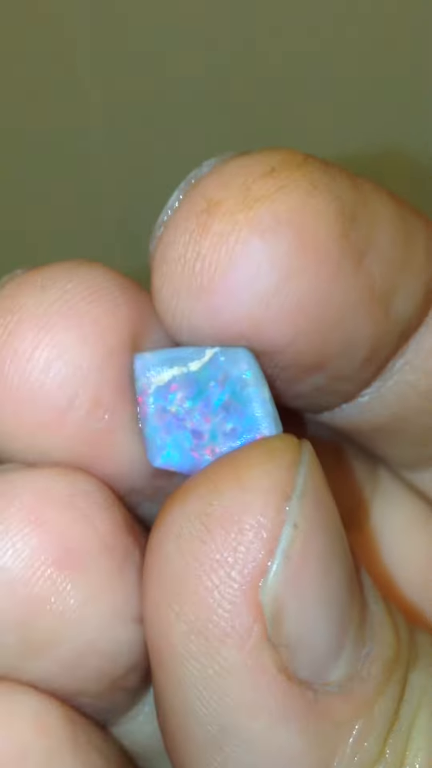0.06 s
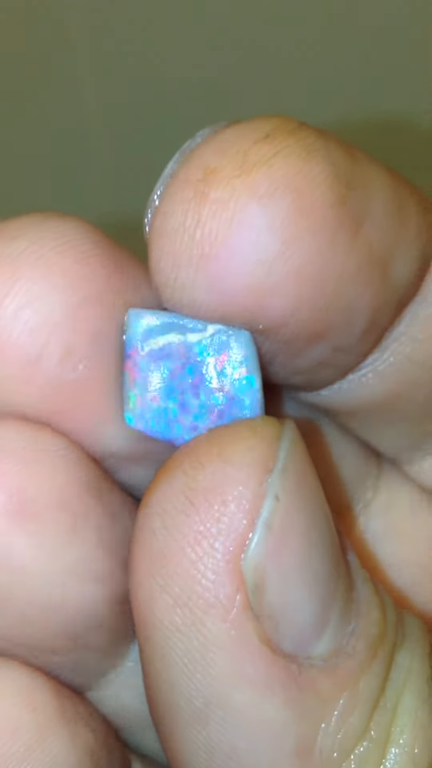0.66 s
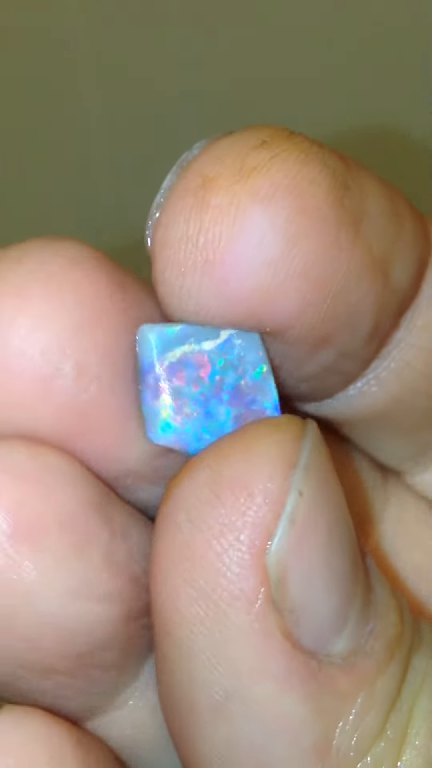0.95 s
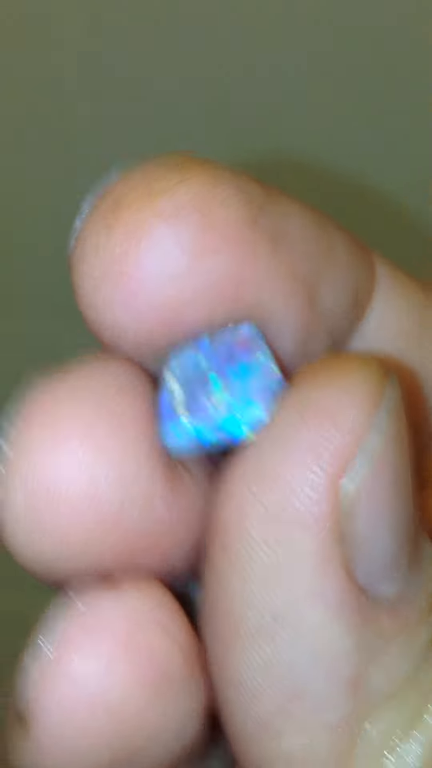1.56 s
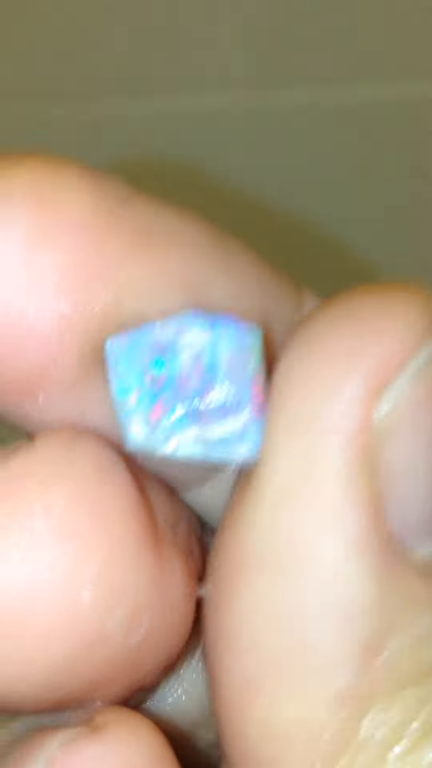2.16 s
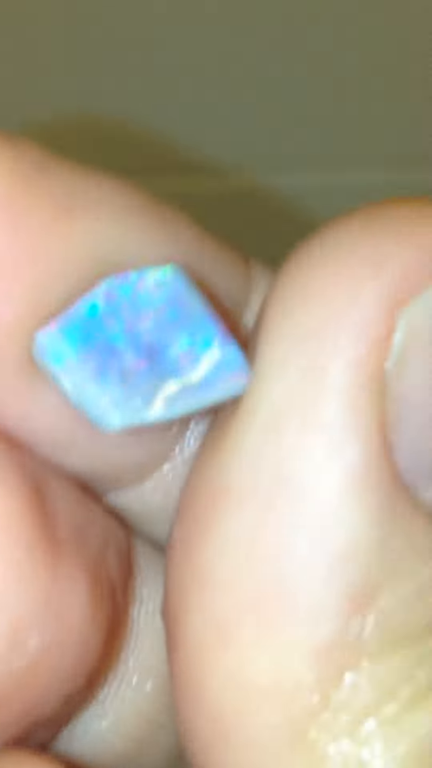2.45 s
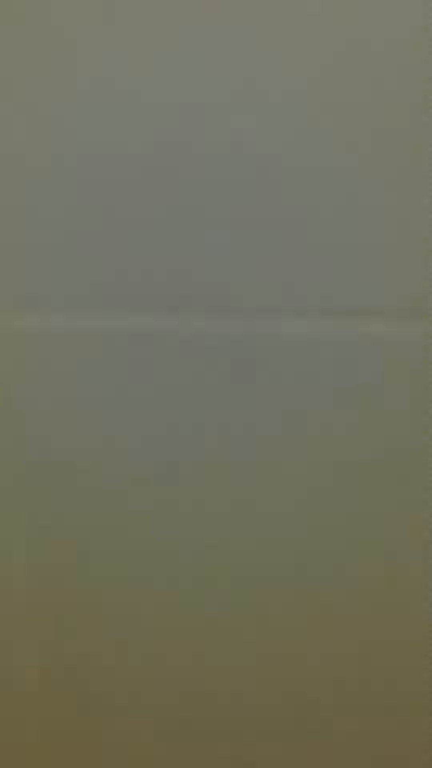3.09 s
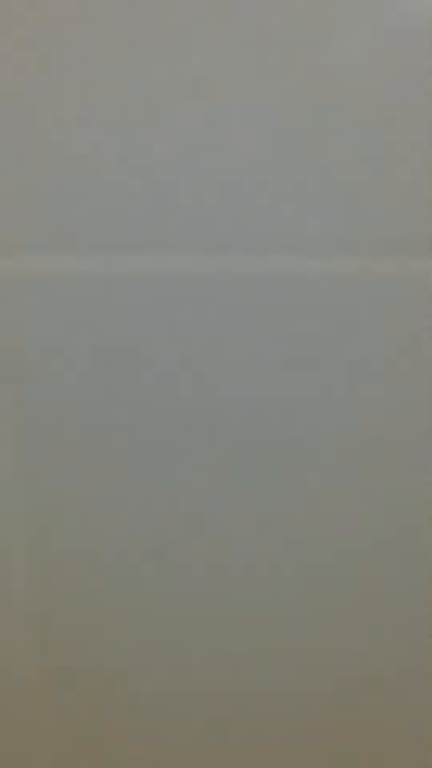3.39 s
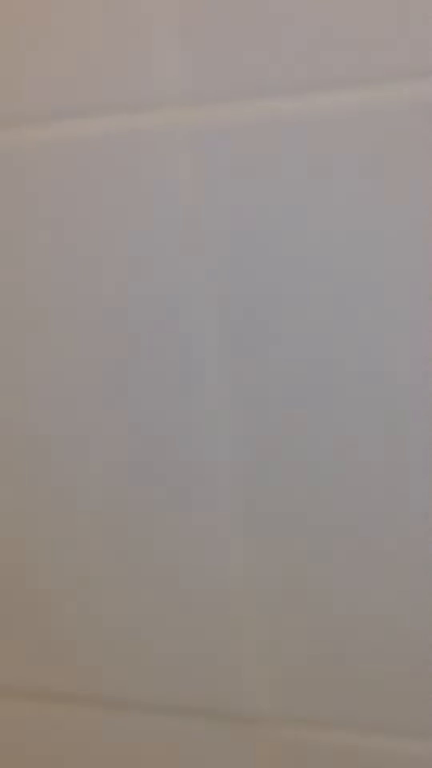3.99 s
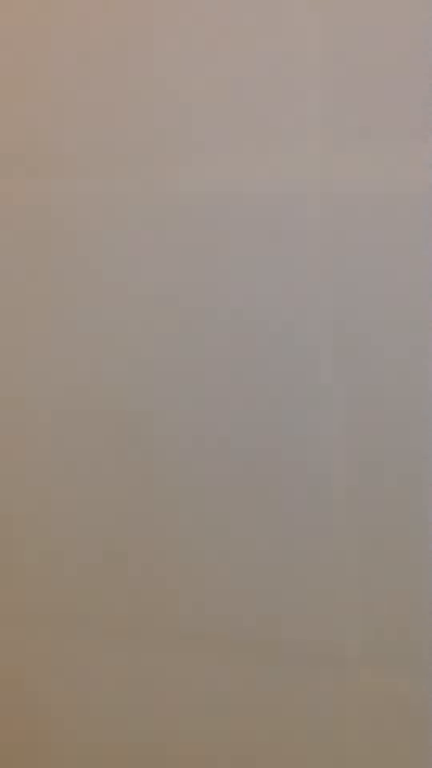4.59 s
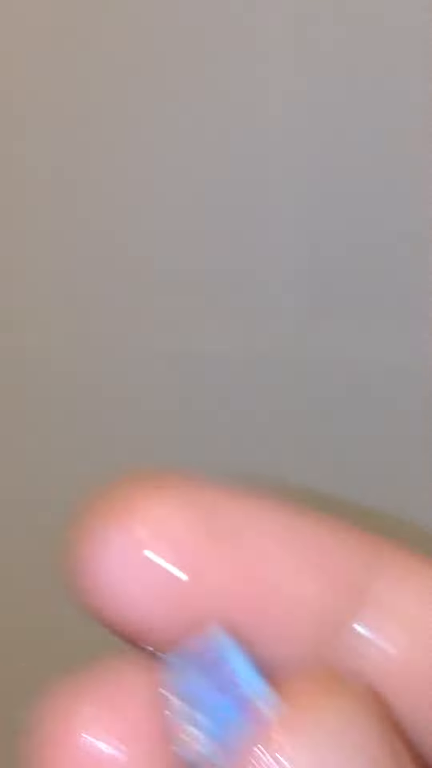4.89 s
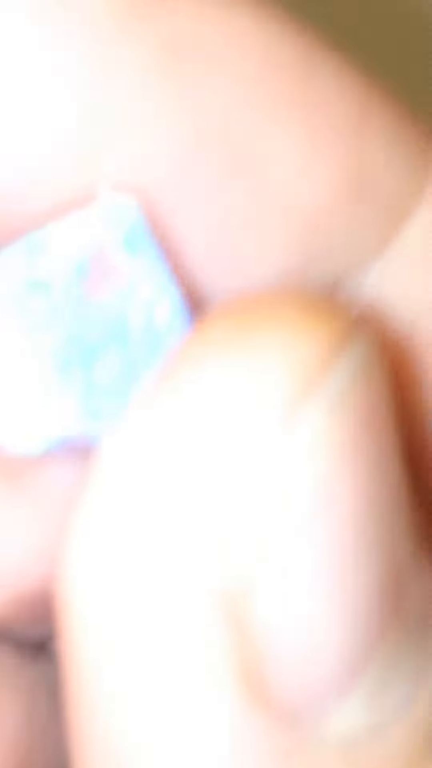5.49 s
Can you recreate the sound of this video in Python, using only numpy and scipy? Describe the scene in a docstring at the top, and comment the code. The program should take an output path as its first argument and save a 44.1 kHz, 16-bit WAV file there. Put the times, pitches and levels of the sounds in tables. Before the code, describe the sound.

Water drips sharply and irregularly in a small tiled room over a faint fizzing trickle, with a few soft knocks on the microphone.

```python
"""Water drips close to a camera in a small tiled room. Each drop is a bright splat plus the brief,
rising ring of a trapped bubble, thrown back by the hard walls. The highest sounds are small dry ticks
close to the microphone, perhaps a fingertip on the camera. Underneath fizzes a thin stream of
mist and tiny droplets that swells round the main drops and breaks off once.
A hand knocks softly on the camera a few times, over room air, a rumble and a low hum."""
import sys
import numpy as np
from scipy import signal
from scipy.fft import rfft, irfft, next_fast_len
from scipy.io import wavfile

SR = 44100
rng = np.random.default_rng(int(sys.argv[2]) if len(sys.argv) > 2 else 0)


def put_to_file(sound):
    """Save the sound as 16-bit audio at rate SR, in the file named by the first command-line argument."""
    columns = np.atleast_2d(sound).T  # one column per channel
    safe = np.clip(columns, -1, 1)
    whole_steps = np.round(safe * 32767)
    wavfile.write(sys.argv[1], SR, whole_steps.astype(np.int16))


N = 244314


def amp(db):
    """Decibels to gain."""
    return 10 ** (np.asarray(db) / 20)


def unit_rms(x):
    """Scales to an rms of one."""
    return x / np.sqrt(np.mean(x ** 2) + 1e-20)


def unit_burst(x, window_s=0.01):
    """Scales a one-shot to the energy of an rms of one held for window_s."""
    return x * np.sqrt(window_s * SR / (np.sum(x ** 2) + 1e-20))


def curve_at(points, hz):
    """Reads a curve on a log-frequency axis."""
    freqs, values = np.transpose(points)
    return np.interp(np.log(hz + 1), np.log(freqs + 1), values)


def add(mix, start_s, sound):
    """Lays a sound into the mix at start_s."""
    part = mix[max(round(start_s * SR), 0):][:len(sound)]
    part += sound[:len(part)]


def equalise(x, eq, size=2048):
    """Causal filter that follows an EQ curve."""
    log_gain = np.log(amp(curve_at(eq, abs(np.fft.fftfreq(size, 1 / SR)))))
    taps = np.fft.ifft(np.exp(signal.hilbert(log_gain).conj())).real
    return signal.fftconvolve(x, taps)[:len(x)]


def noise(gain_at):
    """Steady noise with the spectrum gain_at(Hz) and an rms of one."""
    size = next_fast_len(N, True)
    spectrum = rfft(rng.standard_normal(size)) * gain_at(np.fft.rfftfreq(size, 1 / SR))
    return unit_rms(irfft(spectrum, size)[:N])


def drift(rate_hz):
    """Smooth random modulator with an rms of one, rolling off above rate_hz."""
    steps = N // 64 + 1
    freqs = np.fft.rfftfreq(steps, N / steps / SR)
    slow = irfft(rfft(rng.standard_normal(steps)) / (1 + (freqs / rate_hz) ** 4), steps)
    return unit_rms(np.interp(np.linspace(0, steps - 1, N), np.arange(steps), slow))


# tone of the room's air: (frequency [Hz], relative level [dB])
AIR_EQ = [(20, -17), (40, -55), (65, -11), (90, -9.5), (150, 1), (220, -8.5), (400, -8.5), (800, -17.5),
          (1700, -17), (3000, -16.5), (4300, -15), (7500, -17.5), (15000, -26.5)]
# midrange bands that come and go: (centre [Hz])
WAVERING_BANDS = [310, 380, 1150]
# fader ride of the rumble, before its random swell: (time [s], level [dB])
RUMBLE_RIDE = [(0, -67), (1.25, -65.5), (1.5, -73.5), (2.0, -67.5), (2.3, -71), (3.3, -72), (3.95, -63),
               (4.15, -71), (4.95, -79), (5.2, -60.5), (5.54, -69)]
# partials of the hum: (frequency [Hz], average level [dB])
HUM_PARTIALS = [(71, -74), (119.5, -73.5), (240, -78), (482, -79.5)]

def room_tone(air_db=-61.5, mids_db=-79.0, rumble_hz=72, rumble_width_hz=11):
    """The bed: soft air with restless mids, a swelling rumble and a wavering hum."""
    t = np.arange(N) / SR
    rumble = noise(lambda f: 1 / (1 + ((f - rumble_hz) / rumble_width_hz) ** 2))
    bed = amp(air_db) * noise(lambda f: amp(curve_at(AIR_EQ, f)))
    for centre in WAVERING_BANDS:
        band = noise(lambda f: 1 / (1 + ((f - centre) / (0.54 * centre)) ** 4))
        bed += band * amp(mids_db + 3 * drift(rate_hz=21))
    bed += rumble * amp(np.interp(t, *np.transpose(RUMBLE_RIDE)) + 4 * drift(rate_hz=12))
    for hz, db in HUM_PARTIALS:
        peak = np.sqrt(2) * amp(db + 2 * drift(rate_hz=2.3))
        bed += peak * np.sin(2 * np.pi * hz * t + 0.78 * drift(rate_hz=0.73))
    return bed


# slap off a close corner, about as loud as the direct sound: (delay [s], gain [linear])
CORNER_SLAP = [(.0031, .4), (.0038, 1.05), (.0046, -.35)]
# early reflections off the farther walls: (delay [s], gain [linear])
WALL_ECHOES = [(.0062, 0.23), (.0095, 0.22), (0.016, 0.17), (.0200, 0.24), (.0260, 0.39)]
# reverb of the tiles: (frequency [Hz], time to fall 60 dB [s])
TILE_DECAY = [(300, 0.4), (2000, 0.2), (4500, 0.22), (8000, 0.21), (15000, 0.15)]

def tiled_room(tail_db, build_s=0.0032, size=16384, spacing=16):
    """Impulse response from one random spot: direct sound, corner slap, walls, then a dense tail."""
    echoes = np.zeros(size)
    at = np.arange(0, size, spacing) + rng.integers(0, spacing, size // spacing)
    echoes[at] = rng.choice([-1, 1], len(at)) * amp(4.15 * np.clip(rng.standard_normal(len(at)), -2, 2))
    hz, t, bands = signal.stft(echoes, SR, nperseg=256)
    decay = amp(-60 * t / curve_at(TILE_DECAY, hz)[:, None])
    tail = signal.istft(bands * decay, SR)[1][:size]
    tail *= np.minimum(np.arange(size) / SR / build_s, 1)
    response = amp(tail_db) * tail / np.linalg.norm(tail)
    response[0] += 1
    for delay, gain in CORNER_SLAP + WALL_ECHOES:
        response[round(delay * SR * rng.uniform(0.95, 1.05))] += gain
    return response


def ring(hz, glide, decay_cycles, size=2048):
    """A damped resonance; in a drop, an air bubble whose pitch rises as it nears the surface."""
    age = np.arange(size) / SR * hz / decay_cycles  # in decay times
    pitch = hz * 2 ** (glide * (np.minimum(age, 1.8) - 0.8))
    attack = (1 - np.exp(-age / 0.25)) ** 2
    return unit_burst(attack * np.exp(-age) * np.sin(2 * np.pi * np.cumsum(pitch) / SR))


# cues for the hand on the camera: (time [s], dry level [dB], pitch [Hz])
KNOCK_CUES = [(3.037, -55.5, 105), (3.1026, -56, 980), (3.794, -59, 610), (4.019, -55.5, 69.4),
              (4.8942, -51.5, 1033)]

def hand_knocks(send_db=-2.0):
    """Dull knocks that reach the microphone mostly through the camera body, with some room."""
    thuds = np.zeros(N)
    for start_s, db, hz in KNOCK_CUES:
        add(thuds, start_s, amp(db) * ring(hz, glide=0, decay_cycles=0.65))
    room = tiled_room(tail_db=1.5)
    return thuds + amp(send_db) * signal.fftconvolve(thuds, room / np.linalg.norm(room))[:N]


# tone of water hitting the wet surface: (frequency [Hz], relative level [dB])
SPLAT_EQ = [(300, -16), (1200, -0.5), (2200, 0), (4200, -5), (6200, -1), (7900, -1), (10000, -4),
            (12500, 0.5), (15500, -3.5)]

def splat(ring_hz, decay_s, attack_s=0.000096, size=1024):
    """The impact, a crack of noise: a larger drop has a lower bubble and a duller crack."""
    t = np.arange(size) / SR
    envelope = (1 - np.exp(-t / attack_s)) * np.exp(-t / decay_s)
    crack = equalise(rng.standard_normal(size) * envelope, SPLAT_EQ)
    edges_hz = [min(0.82 * ring_hz, 4000), min(2.98 * ring_hz, 0.45 * SR)]
    return unit_burst(signal.lfilter(*signal.butter(2, edges_hz, "bandpass", fs=SR), crack))


def stream_gate(t, break_s=4.15, resume_s=4.456, fade_db_per_s=420):
    """The stream breaks off once: a fast fade out, then a hard cut back in."""
    return np.where(t < resume_s, amp(-fade_db_per_s * np.maximum(t - break_s, 0)), 1)


# fader ride of the stream: (time [s], relative level [dB])
FLOW_RIDE = [(0.0, -61), (0.15, -52), (0.28, -56), (0.51, -59), (0.72, -59.5), (1.05, -53), (1.48, -58),
             (2.02, -56.5), (2.61, -60.5), (2.97, -52.5), (3.23, -59.5), (3.93, -51.5), (4.01, -65.5),
             (4.1, -58.5), (4.7, -56.5), (4.898, -54), (5.392, -55.5), (5.54, -54)]

def stream_flow(trim_db=1.5, waver_db=0.66, surge_db=-9.5, rise_s=0.0083, fall_s=0.084):
    """The stream's envelope: it surges round each foreground cue, more for a louder crack."""
    t = np.arange(N) / SR
    ride_db = np.interp(t, *np.transpose(FLOW_RIDE))
    power = amp(trim_db + ride_db + waver_db * drift(rate_hz=12)) ** 2
    for start_s, _, _, _, crack_db in DRIP_AND_TICK_CUES:
        away = np.maximum((start_s - t) / rise_s, (t - start_s) / fall_s)
        power += (amp(crack_db + surge_db) * np.exp(-np.minimum(away, 20))) ** 2
    return stream_gate(t) * np.sqrt(power)


# tone of the fine spray: (frequency [Hz], relative level [dB])
MIST_EQ = [(400, -15), (1000, -10.5), (1600, -13.5), (3000, -14.5), (5000, -17), (7500, -20), (10000, -9.5),
           (12500, -9.5), (15500, -9.5)]

def stream(mist_db=-2.5, patter_db=-2.0, droplets_per_s=400, spread_db=6.5, spots=16):
    """The thin stream breaks into a fine mist and a patter of tiny droplets; both follow the flow."""
    flow = stream_flow()
    hiss = noise(lambda f: amp(curve_at(MIST_EQ, f)))
    mist = unit_rms(hiss * amp(2 * drift(rate_hz=114)))
    triggers = rng.random(N) < droplets_per_s / SR
    hits = triggers * amp(spread_db * np.minimum(rng.exponential(1, N), 3))
    landing_spot = rng.integers(0, spots, N)
    patter = np.zeros(N)
    for spot, hz in enumerate(np.geomspace(7000, 14500, spots)):
        droplet = ring(hz, glide=0.17, decay_cycles=1.9)
        add(droplet, 0, splat(hz, decay_s=0.00066))
        droplet_in_room = signal.fftconvolve(droplet, tiled_room(tail_db=5.5))
        patter += signal.oaconvolve(hits * (landing_spot == spot), droplet_in_room)[:N]
    return flow * (amp(mist_db) * mist + amp(patter_db) * unit_rms(patter))


def filler_cues(per_s=11, low_hz=6900, high_hz=13500, glide=0.26, spread_db=2):
    """Faint, high drips and ticks, loosely spaced while the stream runs."""
    cues = []
    for slot, (when, strength, pitch, force) in enumerate(rng.random((128, 4))):
        start_s = (slot + when) / per_s
        if start_s < N / SR and stream_gate(start_s) > 0.5:
            ring_db = -51.5 + spread_db * (2 * strength - 1)
            crack_db = ring_db - 5.5 + spread_db * (2 * force - 1)
            hz = low_hz * (high_hz / low_hz) ** pitch
            cues.append((start_s, ring_db, hz, glide, crack_db))
    return cues


# tone that the wet surface gives the drips: (frequency [Hz], gain [dB])
SURFACE_EQ = [(120, -28), (400, 1), (800, -7), (1250, -10), (1700, -0.5), (2600, -1.5), (15000, -1.5)]
# foreground drips and, near 12 kHz, dry ticks: (time [s], relative ring level [dB], pitch [Hz],
# upward glide [octaves per decay time], relative crack level [dB])
DRIP_AND_TICK_CUES = [ (.116, -43, 6670, .2, -48), (0.1294, -36.5, 4860, 0.32, -44.5),
                      (.267, -49, 10700, 0.31, -52), (.587, -46, 11600, .5, -53),
                      (.698, -37.5, 9300, 0.88, -42.5), (0.8525, -37, 4900, 0.55, -48),
                      (1.1566, -39, 4030, 0.64, -41), (1.3175, -47.5, 8200, 0.17, -68),
                      (1.447, -52, 2140, 0.77, -56), (1.4897, -50, 11800, 0.28, -53),
                      (1.803, -40.5, 11400, 0.74, -49.5), (1.8843, -54, 8600, 0.41, -47),
                      (2.0079, -28, 4230, 0.32, -34.5), (2.309, -40, 5600, .42, -50),
                      (2.5284, -61, 13200, 0.89, -44), (2.5964, -36.5, 5800, .3, -39.5),
                      (2.9105, -45, 7300, 0.54, -50), (2.9635, -40.5, 3840, 0.39, -53),
                      (2.963, -38.5, 6050, 0.3, -48), (3.003, -43.5, 12250, 0.18, -52),
                      (3.3582, -44, 5530, 0.18, -47), (3.3707, -41, 6340, 0.3, -48),
                      (3.4283, -50, 13400, .2, -51), (3.4566, -58, 11300, .25, -48),
                      (3.8587, -33.5, 4580, 0.27, -39), (3.927, -39, 8770, 0.18, -43.5),
                      (4.115, -45, 9000, 0.3, -51), (4.1425, -47.5, 5600, 0.22, -54),
                      (4.209, -58.5, 4000, 0.037, -85), (4.3199, -67, 11000, 0.97, -54.5),
                      (4.358, -53, 5120, 0.074, -59), (4.4728, -25.5, 2153, 0.41, -30),
                      (4.4739, -23.5, 3410, 0.39, -37), (4.505, -57, 12900, .1, -40),
                      (4.5331, -53, 7740, 0.52, -40.5), (4.6292, -38, 8500, 0.25, -49),
                      (5.1224, -45.5, 6730, 0.14, -52), (5.1425, -37, 7630, .36, -43.5),
                      (5.2945, -37.5, 4250, 0.17, -42.5), (5.4664, -56, 11600, 0.23, -46.5)]

def drips_and_ticks(ring_trim_db=-4.5, crack_trim_db=-1.5, tick_hz=12400, tick_direct_db=1.5):
    """Each drop splats, rings a bubble and, landing on its own spot, has its own echoes."""
    bus = np.zeros(N)
    for start_s, ring_db, hz, glide, crack_db in DRIP_AND_TICK_CUES + filler_cues():
        decay_cycles = 1.93 / (abs(glide) + 0.26)  # a bubble that glides less rings longer
        hit = amp(ring_db + ring_trim_db) * ring(hz, glide, decay_cycles)
        add(hit, 0, amp(crack_db + crack_trim_db) * splat(hz, decay_s=0.0021))
        # the highest sounds are small dry ticks close to the microphone, perhaps a fingertip
        direct = amp(tick_direct_db * (hz / tick_hz) ** 2)
        room = tiled_room(tail_db=4.0) / direct
        room[0] = direct
        add(bus, start_s, signal.fftconvolve(hit, room))
    return equalise(bus, SURFACE_EQ)


def scene():
    """Mono mix of drips, ticks, knocks, stream and room tone."""
    return (drips_and_ticks() + hand_knocks() + stream() + room_tone())[None]


def record(dry):
    """A steep low-pass on the master takes off the very top."""
    taps = signal.firwin(401, cutoff=15450, window=("kaiser", 8), fs=SR)
    return signal.oaconvolve(dry, taps[None], "same")


dry = scene()
out = record(dry)
put_to_file(out)
```